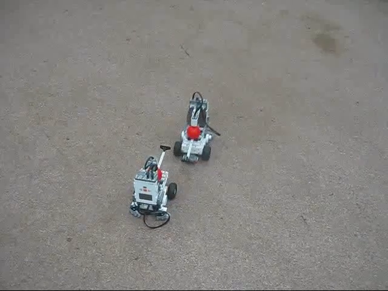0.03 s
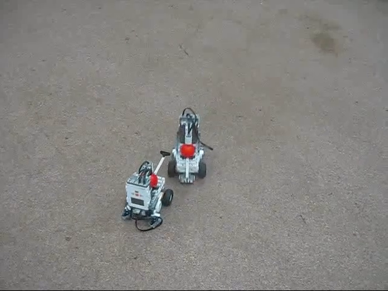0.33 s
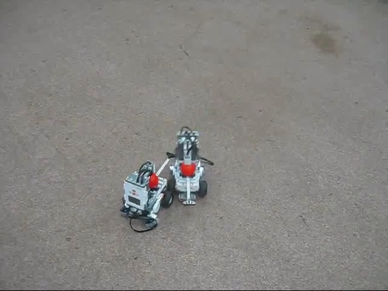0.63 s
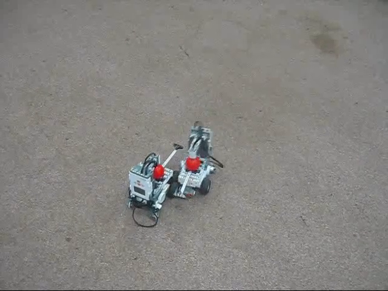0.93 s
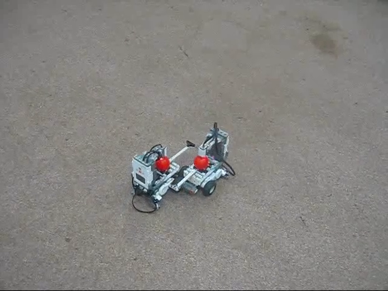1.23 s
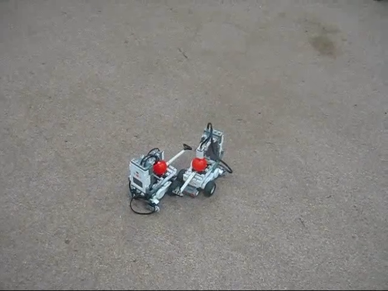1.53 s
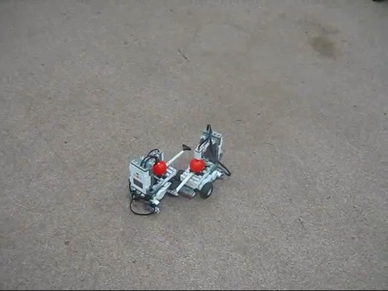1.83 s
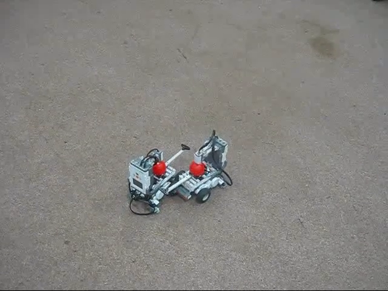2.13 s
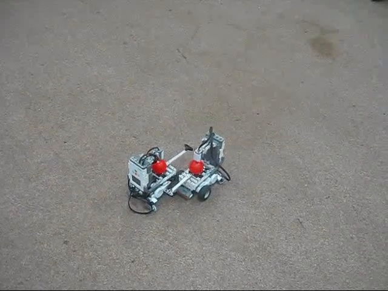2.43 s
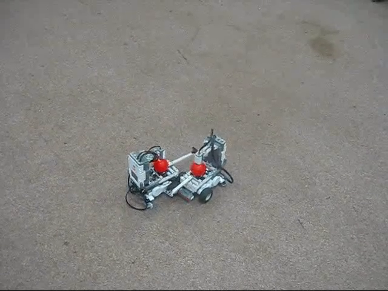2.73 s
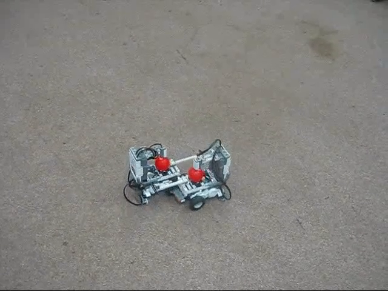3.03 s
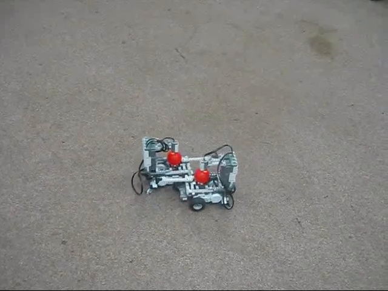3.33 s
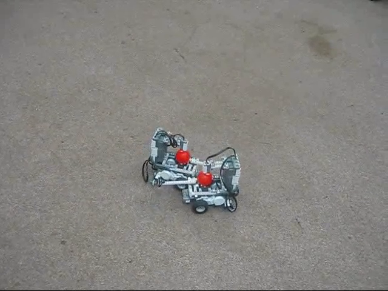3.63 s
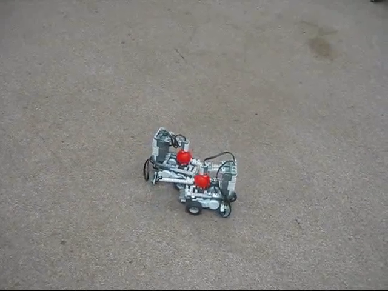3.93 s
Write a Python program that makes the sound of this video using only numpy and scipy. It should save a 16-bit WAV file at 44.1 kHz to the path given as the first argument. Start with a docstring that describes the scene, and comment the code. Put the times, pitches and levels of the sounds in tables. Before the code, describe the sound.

Two toy robots' small geared motors whine steadily, with rattling plastic gears, in a quiet room. Plastic knocks come at about 0.7 and 1 second, and the whine starts wavering, with brief squeals. It sags lower and softer from 1.3 to 1.8 seconds. More knocks fall between 2 and 3 seconds as the pitch dips and recovers. From 3 to 4 seconds the gears grind and the plastic chatters.

```python
"""Toy robots shoving

Two wheeled toy robots drive into each other and shove on a bare floor in a quiet room.
Their geared motors whine, sagging and squealing under load and springing back as wheels slip.
The plastic gear trains rattle; the frames chatter in rising bursts and knock together."""
import sys
import numpy as np
from scipy import signal
from scipy.fft import rfft, irfft, next_fast_len
from scipy.io import wavfile
from scipy.ndimage import uniform_filter1d, map_coordinates

SR = 44100
rng = np.random.default_rng(int(sys.argv[2]) if len(sys.argv) > 2 else 0)


def unload_audio(sound):
    """Save the sound as a 16-bit wav file, at the path given as the first command line argument."""
    columns = np.transpose(np.atleast_2d(sound))
    # keep every value between -1 and 1, then stretch to whole-number steps
    steps = np.round(np.clip(columns, -1, 1) * 32767)
    wavfile.write(sys.argv[1], SR, steps.astype(np.int16))


N = 4 * SR
T = np.arange(N) / SR

# Pitch and level rides of each drive: t/s, f/Hz of the lowest gear mesh, level/dB
DRIVE_A = [(0.0, 1936, -29), (0.2, 1989, -30), (0.69, 1993, -30), (0.712, 2008, -22), (0.735, 1723, -35),
           (0.76, 1577, -25), (0.783, 1754, -39), (0.795, 2040, -21.5), (0.83, 1859, -30.5),
           (0.86, 1700, -41), (0.92, 1900, -34), (0.94, 1995, -29), (0.97, 1712, -36), (0.995, 1598, -37),
           (1.015, 1948, -34), (1.08, 1917, -38), (1.13, 1996, -48), (1.2, 1963, -30.5), (1.23, 1690, -51),
           (1.35, 1428, -36), (1.42, 1224, -41), (1.7, 1316, -43.5), (1.755, 1620, -32.5),
           (1.79, 1791, -40), (1.84, 1830, -37), (1.86, 1620, -39), (1.89, 1657, -30.5), (1.93, 1824, -48),
           (1.99, 1872, -30), (2.035, 1794, -34), (2.068, 1489, -26), (2.083, 1898, -57),
           (2.095, 1968, -26), (2.13, 1849, -36), (2.17, 1602, -65), (2.33, 1684, -36), (2.405, 1349, -35),
           (2.43, 1870, -40.5), (2.5, 1433, -35), (2.56, 1756, -36.5), (2.65, 1740, -45), (2.68, 1297, -35),
           (2.745, 1610, -39), (2.775, 1959, -30.5), (2.8, 1892, -37), (2.838, 1521, -34),
           (2.853, 1797, -32), (2.895, 1708, -35), (2.925, 1351, -35), (2.942, 1931, -36), (3.0, 1835, -29),
           (3.025, 1751, -37), (3.045, 1884, -32), (3.165, 1806, -28), (3.215, 1499, -37),
           (3.255, 1937, -30), (3.5, 2037, -57), (3.58, 1652, -37), (3.77, 1694, -56), (3.82, 1840, -38.5),
           (4.0, 1900, -44)]
DRIVE_B = [(0.0, 1684, -39), (0.69, 1701, -43), (0.76, 1280, -57), (0.97, 1828, -30.5), (1.04, 1806, -30),
           (1.075, 1572, -48), (1.2, 1601, -36), (1.42, 1854, -37.5), (1.82, 1826, -42.5),
           (2.065, 1232, -58), (2.2, 1254, -43), (2.32, 1129, -32.5), (2.4, 1743, -40), (2.6, 1368, -41),
           (2.65, 1448, -31.5), (2.7, 1376, -38), (2.775, 1640, -37), (2.83, 1346, -33), (2.93, 1559, -43),
           (3.08, 1802, -32), (3.185, 1501, -37), (3.25, 1293, -35), (3.35, 1335, -27), (3.47, 1557, -38),
           (3.57, 1306, -34.5), (3.72, 1231, -45), (3.8, 1496, -37), (3.87, 1681, -32), (4, 1742, -48)]
# Partials of each gear train: multiple of the shaft rate, level/dB
MESH_A = [(16, 4), (24, -2), (32, -6.5), (40, -3)]
MESH_B = [(16, -3), (24, -5), (32, -7.5), (40, 0)]
# Tone colour of the plastic housing: f/Hz, level/dB
HOUSING_EQ = [(1000, -6), (1500, -3), (1950, 0), (2350, -4.5), (2850, 3), (3500, -0.5), (4100, -2.5),
              (4600, 0.5), (5300, -44)]
TEETH = 16

def whine(drive, mesh, turns, eccentric, trim_db):
    """The meshing gears of one drive sing a stack of tones, coloured by the housing."""
    hz, level_db = curves(drive)
    out = np.zeros(N)
    for order, tone_db in mesh:
        housing_db = along(HOUSING_EQ, hz * order / TEETH)
        out += amp(tone_db + housing_db) * mesh_tone(order, turns, eccentric)
    return out * amp(level_db + trim_db)

def shaft_turns(drive, flutter):
    """Running count of turns of a motor shaft whose speed flutters."""
    mesh_hz, _ = curves(drive)
    return np.cumsum(mesh_hz * (1 + flutter * wobble(170))) / TEETH / SR

# The gears grind as the locked robots swing round: midpoint t/s, half length/s, phase jitter/rad
GRIND = (3.2, .22, .8)

def mesh_tone(order, turns, eccentric, jitter_rad=0.25):
    """One gear mesh: a gritty tone that sways with the shaft and, more slowly, with the next gear."""
    sway = 1 + np.clip(eccentric, 0, 0.6) * np.sin(2 * np.pi * (turns + rng.random()))
    runout = np.sin(2 * np.pi * (turns / 5 + rng.random()) + wobble(20))
    grit_db = 1.3 * wobble(260) + 1.3 * wobble(55) + 2.8 * runout
    middle, half_length, grind_rad = GRIND
    grind = grind_rad * np.exp(-((T - middle) / half_length) ** 4) * wobble(200)
    phase = 2 * np.pi * order * turns + jitter_rad * wobble(500) + grind
    return unit(sway * amp(grit_db)) * np.sin(phase)

# The first drive strains: t/s, length/s, upper mesh level/dB, middle mesh level/dB
STRAINS = [(0.706, 0.029, -26, -34), (0.789, 0.059, -42, -27.5), (0.934, 0.041, -20.5, -46),
           (1.03, 0.041, -44, -26), (1.201, 0.015, -20, -30), (1.782, 0.062, -27.5, -33),
           (1.879, 0.013, -23, -27), (1.925, 0.026, -42, -22), (2.001, 0.033, -34, -28),
           (2.095, 0.034, -46, -23), (2.628, 0.028, -24.5, -52), (2.796, 0.027, -19.5, -27),
           (2.843, 0.045, -32, -28), (2.941, 0.011, -37, -19), (2.985, 0.045, -28, -36),
           (3.04, 0.13, -45, -26), (3.755, 0.13, -32, -53), (3.909, 0.018, -33, -26),
           (3.958, 0.05, -32, -27.5)]
# Squealing partials, in multiples of the shaft rate: upper mesh, middle mesh
SQUEAL_ORDERS = (40, 24)

def squeals(turns, attack_s=0.0031, release_s=0.004):
    """Under sudden load the fast gear meshes sing out."""
    out = np.zeros(N)
    for column, order in enumerate(SQUEAL_ORDERS):
        load = np.zeros(N)
        for start, length, *levels_db in STRAINS:
            attack = np.clip((T - start) / attack_s, 0, 1)
            release = np.exp(-np.maximum(T - start - length, 0) / release_s)
            load += amp(levels_db[column]) * attack * release
        out += load * mesh_tone(order, turns, eccentric=0.4)
    return out

# Wheel-slip chirps: t/s, length/s, start f/Hz, end f/Hz, level/dB
SLIPS = [(0.709, 0.046, 4200, 3200, -26.5), (1.006, 0.056, 4750, 4423, -26),
         (1.065, 0.034, 3900, 4120, -25), (1.093, 0.025, 4830, 4560, -26), (2.015, 0.059, 4240, 2960, -27),
         (2.135, 0.041, 2590, 1830, -29.5), (2.182, 0.0644, 3150, 3040, -33),
         (2.755, 0.075, 1843, 2445, -32), (3.134, 0.034, 4764, 4405, -25)]

def wheel_slips(jitter_rad=0.13):
    """A wheel grips or breaks free and its gear note slides quickly."""
    out = np.zeros(N)
    for start, length, start_hz, end_hz, db in SLIPS:
        progress = (T - start) / length
        cycles = np.cumsum(start_hz + (end_hz - start_hz) * np.clip(progress, 0, 1)) / SR
        swell = amp(db) * np.exp(-(2 * progress - 1) ** 4)
        out += swell * np.sin(2 * np.pi * cycles + jitter_rad * wobble(500))
    return out

# Fader rides of the gear rattle and the gearbox ring, before trim: t/s, level/dB
RATTLE_RIDE = [(0, -28), (0.68, -26.5), (0.92, -26.5), (0.945, -24.5), (1.21, -27), (1.26, -32.5),
               (1.45, -36.5), (1.79, -34.5), (1.89, -27), (2.03, -26.5), (2.16, -27), (2.19, -32),
               (2.35, -35.5), (2.5, -41.5), (2.72, -32.5), (2.81, -26.5), (3.19, -24), (3.27, -29),
               (3.52, -27.5), (3.63, -32), (3.74, -31.5), (3.81, -25.5), (4, -25)]
RING_RIDE = [(0, -28.5), (0.68, -27), (0.73, -23), (0.79, -44), (0.92, -24.5), (0.95, -23.5), (1.21, -20),
             (1.25, -46), (1.34, -31.5), (1.7, -29.5), (1.82, -21.5), (1.92, -34), (2.04, -23), (2.2, -38),
             (2.38, -28), (2.58, -30.5), (2.82, -27.5), (3.16, -47), (3.27, -37), (3.52, -25.5),
             (3.64, -35.5), (4, -28)]
# Tone colour of the rattle: f/Hz, level/dB
RATTLE_EQ = [(300, -31), (700, -19), (1100, -10.5), (1500, -4), (2000, -3), (2500, -4.5), (3150, -1),
             (3500, -3.5), (4200, -1.5), (5600, -3), (6150, -0.24), (7300, -10.5), (8600, -13), (9700, -7),
             (11000, -10.5), (12300, -16)]
# Gearbox resonances: f/Hz, width/Hz, level/dB
GEARBOX_MODES = [(4225, 320, 2), (4610, 150, 3.5), (3010, 190, 0.5), (2660, 83, -6), (1930, 110, -21)]

def gear_rattle(turns_a, turns_b, body_trim_db=3.0, ring_trim_db=-2.5):
    """Uneven teeth buzz with both shafts while loose ones clatter and ring the gearbox."""
    def clatter(waver_db):
        buzz = tooth_errors(turns_a) + tooth_errors(turns_b)
        # a slower gear runs out of true
        sway = np.sin(2 * np.pi * (turns_a / 5 + rng.random()) + wobble(18))
        waver = amp(waver_db * (sway + wobble(70)))
        return waver * (0.56 * buzz + impacts(3000, scatter_db=6.5) + 0.72 * rng.standard_normal(N))

    def gearbox(f):
        return sum(amp(db) * resonance(f, hz, width) for hz, width, db in GEARBOX_MODES)

    flickering = patchy(clatter(waver_db=0.36), depth_db=2.1)
    body = unit(filtered(flickering, lambda f: amp(along(RATTLE_EQ, f)) * low_cut(f, 450)))
    ring = unit(filtered(clatter(waver_db=2.0), lambda f: gearbox(f) * low_cut(f, 1200)))
    body *= amp(curves(RATTLE_RIDE)[0] + body_trim_db)
    ring *= amp(curves(RING_RIDE)[0] + ring_trim_db)
    return body + ring

def tooth_errors(turns, size=384):
    """Every tooth is a little different, so the same buzz returns on each turn of the shaft."""
    return unit(map_coordinates(rng.standard_normal(size), [turns * size % size], mode="grid-wrap"))

def impacts(per_second, scatter_db):
    """Loose teeth tick at random, some harder than others."""
    ticks = (rng.random(N) < per_second / SR) * rng.choice([-1, 1], N)
    return unit(ticks * amp(scatter_db * np.minimum(rng.standard_normal(N), 2)))

# Cues where the loaded gears catch: t/s
CATCHES = [.912, 1.145, 1.776, 1.814, 1.864, 1.91, 2.074, 2.138, 2.184, 2.259, 2.435, 2.524, 2.708, 2.786,
           2.928]

def catches(dip_db=-6, half_length_s=0.0041):
    """Gain that ducks the gear noise for an instant at every catch."""
    return amp(dip_db * sum(np.exp(-((T - cue) / half_length_s) ** 2) for cue in CATCHES))

# Swells of frame chatter: peak t/s, rise/s, fall/s, centre f/Hz at the peak, relative level/dB
CHATTER_BURSTS = [(.04, 0.05, 0.021, 827, -21.5), (.10, 0.022, 0.023, 1500, -27.5),
                  (.45, 0.07, 0.019, 695, -30), (.49, 0.068, 0.055, 1060, -30),
                  (.598, 0.023, 0.023, 1180, -23), (.683, 0.014, 0.013, 1540, -26.5),
                  (2.998, 0.0091, 0.018, 1680, -25.5), (3.1, 0.071, 0.059, 750, -24.5),
                  (3.178, 0.024, 0.017, 1520, -30.5), (3.555, 0.1, 0.025, 940, -26),
                  (3.668, 0.037, 0.023, 1250, -24), (3.757, 0.018, 0.023, 1631, -29.5)]
# Frame resonances: f/Hz, width/Hz, relative level/dB
FRAME_MODES = [(663, 15, -6), (927, 50, -8.5), (1057, 35, 3), (1191, 21, -3.5), (1294, 40, 5),
               (1489, 30, 8.5), (1589, 40, 7.5), (1893, 30, 21)]

def frame_chatter(judder_hz=111.6, climb_hz_per_s=2200, spread_hz=121, trim_db=-4.5):
    """Slipping parts judder against the frame, stirring ever higher modes through each burst."""
    cycles = np.cumsum(judder_hz * (1 + 0.25 * wobble(90))) / SR
    judder = unit(np.diff(np.floor(cycles), prepend=0) * amp(5.5 * wobble(100)))
    scrape = 0.88 * rng.standard_normal(N)
    friction = unit(judder + scrape)
    bursts = []
    for peak, rise, fall, centre_hz, db in CHATTER_BURSTS:
        swell = amp(db) * np.exp(-0.5 * ((T - peak) / np.where(T < peak, rise, fall)) ** 2)
        bursts.append((swell, centre_hz + climb_hz_per_s * (T - peak)))

    def midrange(f):
        return low_cut(f, 520, order=4) / (1 + (f / 2500) ** 4)

    out = np.zeros(N)
    for hz, width, db in FRAME_MODES:
        force = sum(swell / (1 + ((hz - centre) / spread_hz) ** 2) for swell, centre in bursts)
        ring = filtered(force * friction, lambda f: resonance(f, hz, width) * midrange(f))
        makeup = np.sqrt(SR / np.pi / width)  # evens out narrow and wide modes
        out += amp(db + trim_db) * makeup * ring
    return out

# Frame-on-frame hits: t/s, thud level/dB, snap level/dB
KNOCKS = [(.728, -13.5, -17), (.994, -10.5, -15), (2.067, -15, -27), (2.408, -16.5, -35), (2.676, -16, -21),
          (2.837, -13, -18), (2.9, -29, -16.5), (3.035, -27, -13)]
# Partials of the thud: f/Hz, relative level/dB, t60/s
THUD_MODES = [(632, -36.5, 0.082), (787, -24.5, 0.078), (1114, -14.5, 0.013), (1176, -10.5, 0.027)]

def knocks(snap_t60_s=0.034, detune=0.024):
    """The frames hit: a short plastic thud under a bright snap."""
    thuds, snaps = np.zeros((2, N + SR))
    t = np.arange(SR // 8) / SR
    for start, thud_db, snap_db in KNOCKS:
        hit = round(start * SR) + np.arange(len(t))
        for hz, db, t60 in THUD_MODES:
            detuned_hz = hz * (1 + detune * rng.standard_normal())
            thuds[hit] += amp(thud_db + db - 60 * t / t60) * np.sin(2 * np.pi * detuned_hz * t)
        snaps[hit] += amp(snap_db - 60 * t / snap_t60_s) * rng.standard_normal(len(t))
    return thuds[:N] + filtered(snaps, lambda f: resonance(f, hz=3200, width=7600))

def room_reverb(x, t60_s=0.22, predelay_s=0.004, wet_db=-11):
    """A short diffuse answer from the walls."""
    t = np.arange(SR // 2) / SR
    tail = rng.standard_normal(len(t)) * amp(-60 * t / t60_s) * (t > predelay_s)
    return amp(wet_db) * signal.fftconvolve(x, tail / np.linalg.norm(tail))[:N]

# Tone colour of the ventilation, before its treble roll-off: f/Hz, level/dB
VENT_EQ = [(20, -16), (35, 2), (70, 0), (170, -6), (220, -2), (400, -8.5), (700, -3), (1100, -4),
           (2500, -17)]

def room_tone(air_db=-45, hum_hz=125.7, hum_db=-58.5):
    """A bed of low ventilation rumble and faint mains hum."""
    air = filtered(rng.standard_normal(N), lambda f: amp(along(VENT_EQ, f)) / (1 + (f / 800) ** 2))
    hum = np.sqrt(2) * np.sin(2 * np.pi * hum_hz * T)
    return amp(air_db) * unit(air) + amp(hum_db) * hum

def amp(db):
    """Decibels to gain."""
    return 10 ** (np.asarray(db) / 20)

def unit(x):
    """Scaled to rms 1."""
    return x / np.sqrt(np.mean(x ** 2) + 1e-20)

def along(eq, hz):
    """Level in dB of an EQ curve at hz, on a log frequency axis."""
    f, db = np.transpose(eq)
    return np.interp(np.log(hz + 1), np.log(f + 1), db)

def curves(rows):
    """One automation lane for each column after the time."""
    times, *columns = np.transpose(rows)
    return [np.interp(T, times, column) for column in columns]

def wobble(rate):
    """A smooth random curve, rate knots a second."""
    return map_coordinates(rng.standard_normal(8000), [T * rate], mode="wrap")

def patchy(x, depth_db):
    """Each band flutters in level on its own."""
    bands = signal.stft(x, nperseg=256)[2]
    flutter = uniform_filter1d(rng.standard_normal(bands.shape), size=9, axis=0)
    flutter = uniform_filter1d(flutter, size=8, axis=1)
    return signal.istft(bands * amp(depth_db * unit(flutter)), nperseg=256)[1][:N]

def filtered(x, response):
    """x shaped by a frequency response."""
    size = next_fast_len(N + SR // 2)
    return irfft(rfft(x, size) * response(np.fft.rfftfreq(size, 1 / SR)), size)[:N]

def resonance(f, hz, width):
    """Response of one mode."""
    return 1j * f * width / (hz * hz - f * f + 1j * f * width)

def low_cut(f, hz, order=2):
    """Response that rolls off below hz."""
    return f ** order / (f ** order + hz ** order)

def scene():
    """Both robots in the room, in mono."""
    turns_a = shaft_turns(DRIVE_A, flutter=0.00799)
    turns_b = shaft_turns(DRIVE_B, flutter=0.00707)
    gears = whine(DRIVE_A, MESH_A, turns_a, eccentric=0.2, trim_db=-0.5)
    gears += whine(DRIVE_B, MESH_B, turns_b, eccentric=0.6, trim_db=0.5)
    gears += squeals(turns_a) + wheel_slips() + gear_rattle(turns_a, turns_b)
    robots = gears * catches() + frame_chatter() + knocks()
    return (robots + room_reverb(robots) + room_tone())[None]

def record(dry):
    """A small camera's microphone: a narrow notch in the treble and a hard high cut."""
    notch_hz, notch_width_hz, top_hz = 7905, 320, 12550
    notch = lambda f: 1 - np.exp(-((f - notch_hz) / notch_width_hz) ** 2)
    return filtered(dry[0], lambda f: notch(f) ** 2 * (f < top_hz))[None]

dry = scene()
out = record(dry)
unload_audio(out)
```